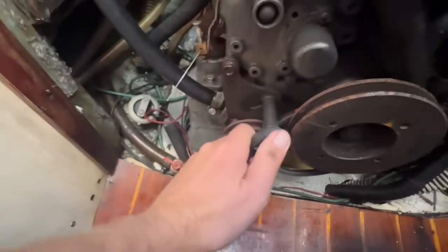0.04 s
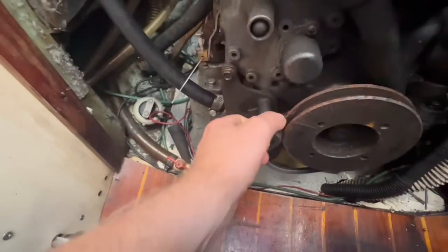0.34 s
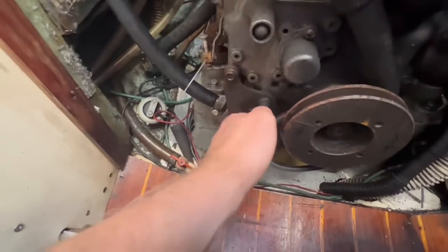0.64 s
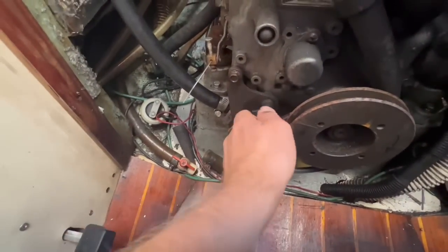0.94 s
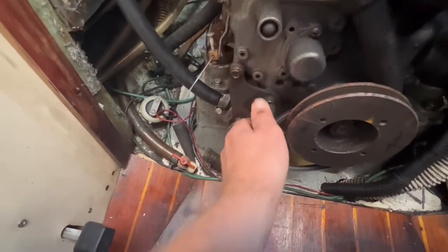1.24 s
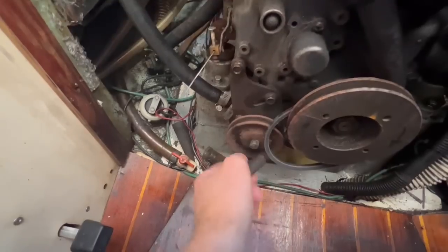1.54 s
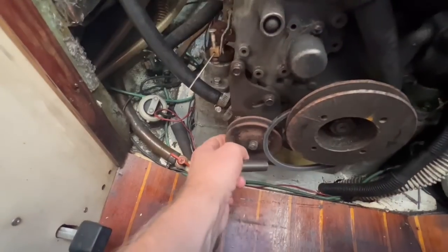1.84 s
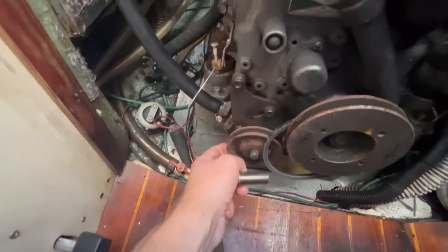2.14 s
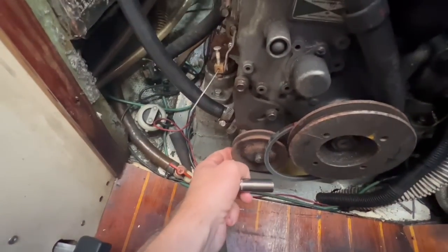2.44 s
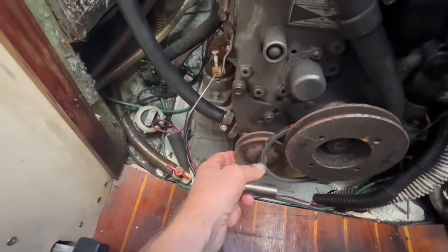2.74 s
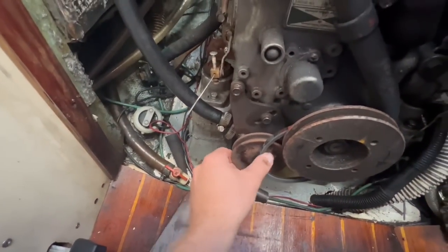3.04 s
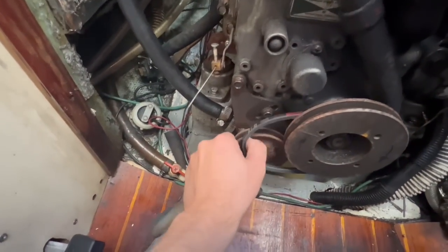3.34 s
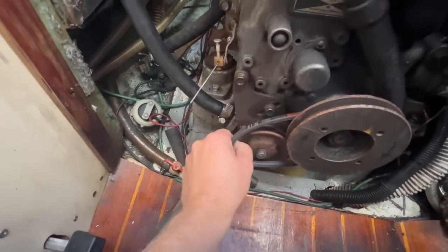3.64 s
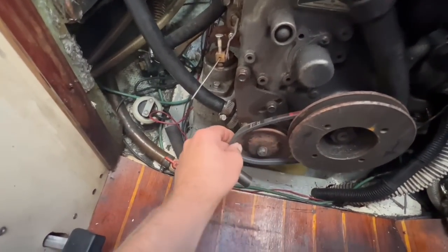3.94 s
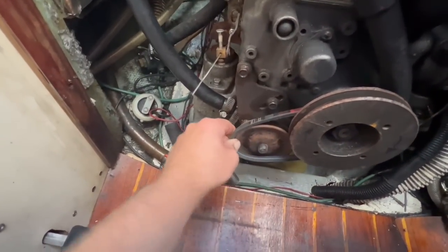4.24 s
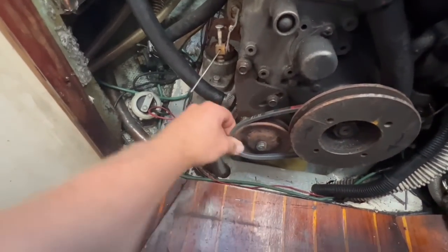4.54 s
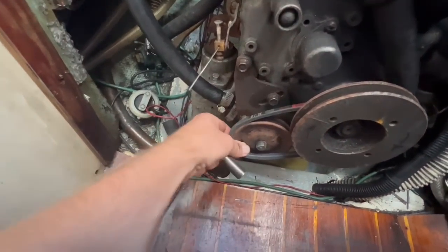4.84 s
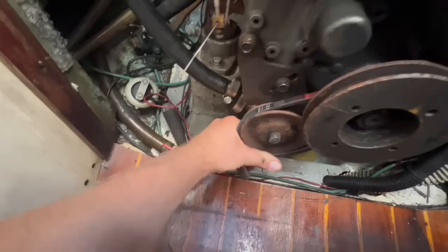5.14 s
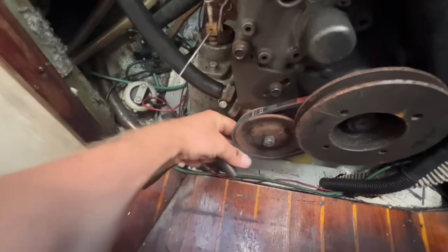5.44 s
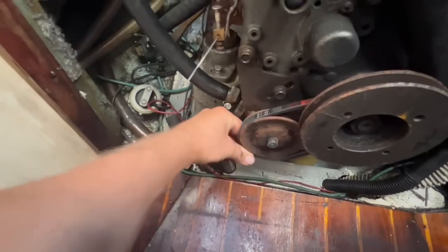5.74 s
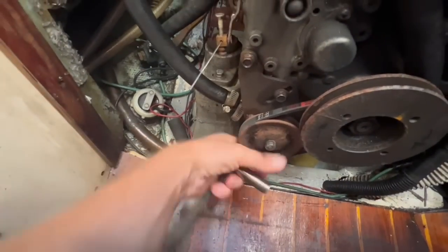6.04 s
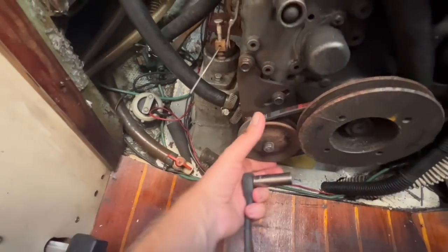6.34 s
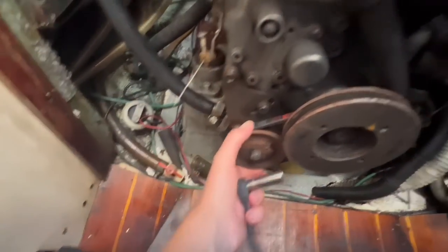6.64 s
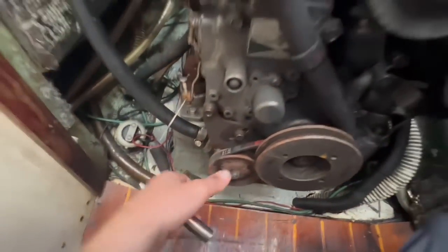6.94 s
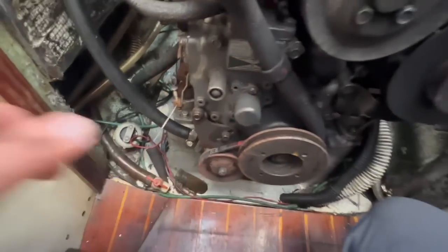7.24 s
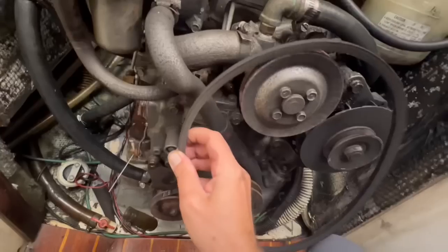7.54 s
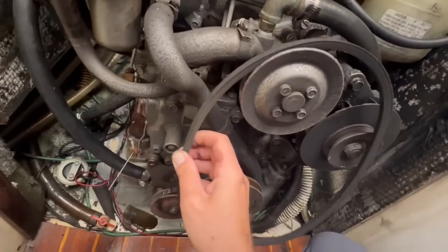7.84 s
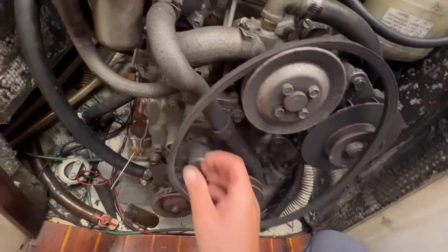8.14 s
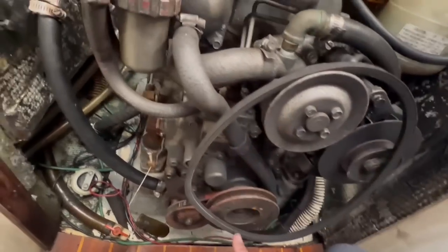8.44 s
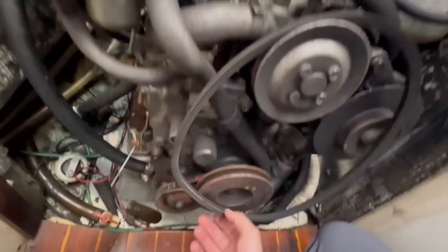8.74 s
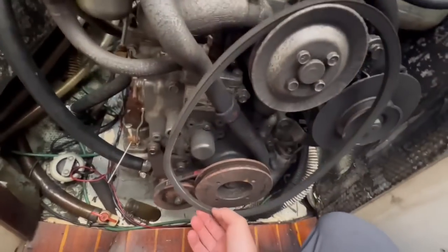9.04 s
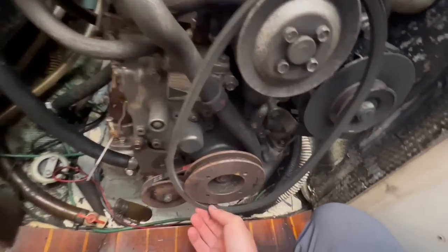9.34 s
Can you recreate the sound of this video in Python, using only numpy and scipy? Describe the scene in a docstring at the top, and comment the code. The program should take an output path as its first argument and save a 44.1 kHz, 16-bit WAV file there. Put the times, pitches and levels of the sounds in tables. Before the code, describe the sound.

A rubber belt is worked onto metal engine pulleys, with light rubbing, a brief creak, and scattered clicks and knocks.

```python
"""In the cramped bay of a stopped engine, a hand holding a socket wrench works a rubber V-belt onto steel pulleys.
The taut belt creaks in its groove by stick-slip friction, slides in fits and slaps against the block.
Impacts excite the damped modes of the wrench, the pulleys, a thin flange and the floorboards.
The bay adds a short reverberation, over a low rumble, a distant machine's hum and a faint hiss.
Sources are computed as mid and side signals, then decoded to left and right."""
import sys
import numpy as np
from scipy import signal
from scipy.fft import rfft, irfft, next_fast_len
from scipy.io import wavfile
from scipy.ndimage import uniform_filter1d, map_coordinates

SR = 44100
rng = np.random.default_rng(int(sys.argv[2]) if len(sys.argv) > 2 else 0)


def wrap_up_sound(samples):
    """Save the sound to the file named by the first command line argument, as 16-bit audio."""
    columns = np.atleast_2d(samples).T
    # keep every value between -1 and 1, then stretch to whole-number steps
    tamed = np.clip(columns, -1, 1)
    steps = np.round(tamed * 32767).astype(np.int16)
    wavfile.write(sys.argv[1], SR, steps)


N = 418509
T = np.arange(N) / SR


def amp(db):
    """Decibels to amplitude ratio; table levels are relative, and gains in series add in dB."""
    return 10 ** (np.asarray(db) / 20)


def unit(x):
    """Normalisation to an rms of 1."""
    return x / np.sqrt(np.mean(x ** 2) + 1e-20)


def along(points, hz):
    """Interpolation of (frequency_hz, value) points on a logarithmic frequency axis."""
    freqs, values = np.transpose(points)
    return np.interp(np.log(hz + 1), np.log(freqs + 1), values)


def noise(size=N):
    """Uncorrelated white noise for mid and side."""
    return rng.standard_normal((2, size))


def wobble(knots_per_s):
    """Slow random modulation: a spline through Gaussian knots."""
    return map_coordinates(rng.standard_normal(int(N * knots_per_s / SR) + 4), [T * knots_per_s])


def fade(t, t60):
    """Exponential decay, 60 dB in t60 seconds."""
    return np.exp(-np.log(1000) * t / t60)


def swell(peak_s, rise_s, fall_s, drop_db=15, roundness=1.58):
    """A rounded envelope, drop_db down at one rise time before its peak and one fall time after."""
    away = np.where(T < peak_s, (peak_s - T) / rise_s, (T - peak_s) / fall_s)
    return np.where(away < 5, amp(-drop_db * away ** roundness), 0)


def add(track, start_s, sound):
    """Superposition of a sound on the track."""
    part = track[:, max(round(start_s * SR), 0):][:, :sound.shape[1]]
    part += sound[:, :part.shape[1]]


def filtered(x, gain):
    """Linear filtering: the spectrum of x times gain(hz)."""
    size = next_fast_len(N + SR // 2)
    return irfft(rfft(x, size) * gain(np.fft.rfftfreq(size, 1 / SR)), size)[..., :N]


def colour(x, gain_db):
    """Minimum-phase filtering by the shape gain_db(hz); white noise keeps its power."""
    n = x.shape[-1]
    size = 2 * next_fast_len(n // 2 + 4096)
    gain = unit(amp(gain_db(np.fft.rfftfreq(size, 1 / SR))))
    cepstrum = irfft(np.log(np.maximum(gain, 1e-6)))
    cepstrum[1:size // 2] *= 2  # folding the cepstrum makes the filter causal
    cepstrum[size // 2 + 1:] = 0
    return irfft(rfft(x, size) * np.exp(rfft(cepstrum)), size)[..., :n]


def shaped(x, spectrum):
    """Spectral shaping by (frequency_hz, level_db) points."""
    return colour(x, lambda hz: along(spectrum, hz))


def resonant(x, modes):
    """Forced response of (centre_hz, width_hz, level_db) resonances, summed in power."""
    def response_db(hz):
        powers = (amp(db) ** 2 / (1 + ((hz - centre) / width) ** 2) ** 2 for centre, width, db in modes)
        return 10 * np.log10(sum(powers))
    return colour(x, response_db)


def spread(x, depth):
    """Diffuse incidence: sound from all round the bay differs more between left and right in the mids."""
    # extra side signal: frequency_hz, gain_db
    widening = [(280, 2.5), (650, 7.5), (1000, 6), (1600, 1)]
    return np.array([x[0], filtered(x[1], lambda hz: amp(depth * along(widening, hz)))])


def rumble(gain_db=-2.0, heave_db=1.9):
    """Low-frequency noise heaves under slow amplitude modulation."""
    # rumble spectrum: frequency_hz, density_db
    spectrum = [(12, -49.5), (20, -10.5), (38, 1), (65, 5.5), (125, -4.5), (155, -16.5), (252, -20.5),
                (288, -23), (443, -31.5), (500, -54), (650, -62), (1100, -120)]
    # its slow contour: time_s, level_db
    contour = [(0.0, -61), (0.21, -55.5), (2.56, -52.5), (5.9, -54), (6.3, -55.5), (7.45, -57.5),
               (9.49, -59.5)]
    level_db = np.interp(T, *np.transpose(contour))
    return amp(level_db + gain_db + heave_db * wobble(7)) * shaped(noise(), spectrum)


def hiss(level_db=-75, waver_db=1.5):
    """Broadband noise wavers faintly while a thin, narrower band comes and goes."""
    # broad hiss: frequency_hz, density_db
    spectrum = [(200, 10), (450, -7), (800, -14), (1250, -12.5), (1900, -4.5), (4500, -13.5), (6000, -21),
                (9500, -19), (15000, -16.5)]
    # colour of the thin hiss: centre_hz, width_hz, level_db
    thin_bands = [(5950, 320, 0.5), (8000, 1900, -8)]
    # its swells: peak_s, level_db
    thin_swells = [(2.801, -73), (4.8, -72), (6.6, -63), (7.8, -75), (8.55, -78)]
    broad = amp(level_db + waver_db * wobble(11)) * spread(shaped(noise(), spectrum), depth=1.9)
    envelope = sum(amp(db) * swell(s, rise_s=0.44, fall_s=0.44) for s, db in thin_swells)
    return broad + envelope * resonant(noise(), thin_bands)


def wavering_tone(pitch_hz, knots_per_s, waver_rad=0.58):
    """A sinusoid of rms 1 under random phase modulation, in the mid signal alone."""
    phase = 2 * np.pi * pitch_hz * T + waver_rad * wobble(knots_per_s)
    return np.array([np.sqrt(2) * np.sin(phase), np.zeros(N)])


def hum():
    """A distant machine radiates a line spectrum of low, wavering tones."""
    # hum partials: pitch_hz, level_db
    partials = [(49, -67.5), (76, -66.5), (120, -72)]
    return sum(amp(db) * wavering_tone(hz, knots_per_s=4.4) for hz, db in partials)


def drone(pitch_hz=235, level_db=-68.5):
    """A faint low tone swells and fades under a single envelope."""
    envelope = swell(peak_s=1.78, rise_s=0.263, fall_s=0.263)
    return amp(level_db) * envelope * wavering_tone(pitch_hz, knots_per_s=1.94)


def bay(x):
    """Reverberation: convolution with a short noise tail whose treble decays soonest."""
    # reverberation time of the engine bay: frequency_hz, t60_s
    decay = [(200, 0.13), (2000, 0.15), (10000, 0.054)]
    hz, t, spectra = signal.stft(noise(SR // 3), SR, nperseg=256)
    tail = signal.istft(spectra * fade(t, along(decay, hz)[:, None]), SR, nperseg=256)[1]
    return signal.fftconvolve(x, tail / np.linalg.norm(tail[0]), axes=1)[:, :N]


def ringing(taps, modes, gain_db, attack_s, roughness, side_db):
    """Free vibration: each tap excites damped modes, and the rubbing contact makes their phases wander."""
    out, t = np.zeros((2, N)), np.arange(SR // 3) / SR
    hz, db, t60 = np.transpose(modes)[:, :, None]
    onset = 1 - np.exp(-t / attack_s)
    for s, tap_db in taps:
        wander = np.cumsum(rng.standard_normal((len(hz), len(t))), axis=1) / np.sqrt(SR)
        phase = 2 * np.pi * hz * t + roughness * wander
        envelopes = amp(db + rng.standard_normal(hz.shape)) * fade(t, t60)
        mid = np.sum(envelopes * np.sin(phase), axis=0)
        side = -amp(side_db) * np.sum(envelopes * np.cos(phase), axis=0)  # the left channel lags
        add(out, s, amp(tap_db + gain_db) * onset * np.array([mid, side]))
    return out


def chatter(rattles, contacts=6):
    """Intermittent contact: each rattle shares its energy among uneven taps, (start_s, level_db)."""
    order = np.arange(contacts)
    for s, length, db in rattles:
        moments = (order + rng.random(contacts) * (order > 0)) / contacts
        levels_db = db - 10 * np.log10(contacts) + 2 * rng.standard_normal(contacts)
        yield from zip(s + length * moments, levels_db)


def floorboards():
    """Soft bumps excite the low bending modes of the boards."""
    # bumps on the floor: start_s, level_db
    bumps = [(0.19, -52.5), (2.06, -61), (2.22, -56.5), (3.87, -55.5), (5.24, -66)]
    # board modes: pitch_hz, level_db, t60_s
    modes = [(161, 7.5, 0.114), (243.5, -3, 0.24), (332, -4, 0.13), (560, -29, 0.088)]
    return ringing(bumps, modes, gain_db=-1.0, attack_s=0.0034, roughness=4.2, side_db=-23)


def wrench():
    """The wrench chatters against the engine; repeated impacts excite its high modes."""
    # wrench rattles: start_s, length_s, level_db
    rattles = [(3.15, 0.063, -55), (3.5444, 0.046, -45), (3.628, 0.015, -55), (3.692, 0.037, -56.5),
               (4.08, .025, -58.5), (4.2767, 0.0028, -57), (4.32, 0.11, -53.5), (4.49, 0.061, -53),
               (4.619, 0.0042, -57.5), (5.5084, 0.0034, -55.5)]
    # wrench modes: pitch_hz, level_db, t60_s
    modes = [(3624, 1.5, 0.095), (7720, 2, 0.073), (11400, -4.5, 0.044)]
    return ringing(chatter(rattles), modes, gain_db=-3.0, attack_s=0.00041, roughness=15, side_db=-10.5)


def flange():
    """The belt makes a thin steel flange chatter and sing in its plate modes."""
    # flange rattles: start_s, length_s, level_db
    rattles = [(7.657, 0.0033, -58), (8.018, .04, -53), (8.125, .055, -53.5), (8.825, 0.016, -50.5),
               (9.12, 0.083, -54.5), (9.221, 0.00187, -60), (9.388, .02, -59), (9.478, 0.0092, -57.5)]
    # flange modes: pitch_hz, level_db, t60_s
    modes = [(4270, -11.5, 0.22), (5460, 0, 0.096), (5500, -11, 0.074), (8050, 4, 0.14), (12200, -2, 0.14)]
    return ringing(chatter(rattles), modes, gain_db=-10.0, attack_s=0.0004, roughness=13, side_db=-7.0)


def upper_pulley():
    """The belt drops on the upper pulley, which rings in inharmonic modes."""
    # belt impacts: start_s, level_db
    taps = [(7.570, -31), (7.658, -63)]
    # pulley modes: pitch_hz, level_db, t60_s
    modes = [(750, -20, 0.12), (890, 3.5, 0.072), (1908, 0.5, 0.13), (2840, 4, 0.015), (3850, -17, 0.07),
             (4000, -4.5, 0.16), (5670, -8, 0.11), (6000, -2, 0.068), (6300, -9.5, 0.12),
             (7160, -9.5, 0.075), (9000, -19, 0.077)]
    return ringing(taps, modes, gain_db=-7.5, attack_s=0.00053, roughness=3.3, side_db=-32)


def pulley_rim():
    """One blow sets a pulley rim in free vibration."""
    # the blow: start_s, level_db
    taps = [(9.421, -36.5)]
    # rim modes: pitch_hz, level_db, t60_s
    modes = [(590, -22, 0.087), (980, -9, 0.054), (1295, -9, 0.095), (4120, 3.5, 0.065), (4430, 1, 0.22),
             (6430, -9, 0.1)]
    return ringing(taps, modes, gain_db=-9.0, attack_s=0.00028, roughness=8.2, side_db=-5.0)


def friction(grains_per_s, grain_share, flutter_db):
    """Friction noise: tiny random catches over a smooth hiss, modulated by an uneven hand."""
    catches = unit((rng.random(N) < grains_per_s / SR) * noise())
    texture = np.sqrt(grain_share) * catches + np.sqrt(1 - grain_share) * noise()
    return unit(texture * amp(flutter_db * wobble(70)))


def drifting(x, drift_db=2.0):
    """As the contact moves, its spectrum shifts in patches of time and frequency."""
    spectra = signal.stft(x, nperseg=1024)[2]
    patches = uniform_filter1d(rng.standard_normal(spectra.shape[1:]), size=3, axis=0)
    patches = uniform_filter1d(patches, size=14, axis=1)
    return unit(signal.istft(spectra * amp(drift_db * unit(patches)), nperseg=1024)[1][:, :N])


def grinding():
    """Forced vibration: rubber dragged round the small pulley drives the resonances of its groove."""
    # pulls on the belt: peak_s, level_db, rise_s, fall_s
    pulls = [(1.359, -65, 0.077, 0.055), (4.379, -69, 0.18, 0.1), (5.319, -65.5, 0.32, 0.54),
             (6.04, -65.5, 0.07, 0.13)]
    # groove resonances: centre_hz, width_hz, level_db
    groove = [(2700, 420, -0.5), (3590, 190, -2), (4300, 240, -3), (4970, 350, -8), (5700, 320, -6)]
    pull = sum(amp(db) * swell(s, rise, fall) for s, db, rise, fall in pulls)
    return pull * resonant(friction(grains_per_s=560, grain_share=0.1, flutter_db=2.0), groove)


def riding_pull(start_s=8.29, end_s=9.1, attack_t60=0.044, release_t60=0.51, ease_db_per_s=2.5):
    """Envelope of the belt riding on the upper pulley: a steady pull that eases exponentially."""
    held = np.clip(T, start_s, end_s)
    edges = fade(np.abs(T - held), np.where(T < held, attack_t60, release_t60))
    return amp(-ease_db_per_s * (held - start_s)) * edges


def sliding(drag_db=-3, ride_db=-65.0, ring_db=-12, drag_catch_db=3.0, rub_catch_db=1.0):
    """Sliding friction: belt and hand rub the metal, pressure adds drag, the belt rides the upper pulley."""
    # strokes along the metal: peak_s, rub_level_db, rise_s, fall_s, drag_level_db
    strokes = [(0.139, -53, 0.17, 0.2, -62.5), (0.45, -63, 0.11, 0.23, -63.5),
               (0.69, -66, 0.12, 0.089, -87), (0.98, -65.5, 0.29, 0.26, -68.5),
               (1.35, -62.5, 0.31, 0.11, -73.5), (1.702, -68.5, 0.84, 0.16, -80),
               (2.22, -66, 0.34, 0.39, -63.5), (2.69, -64, 0.33, 0.19, -63), (2.89, -62.5, 0.19, 0.14, -80),
               (3.19, -62, 0.14, 0.12, -65.5), (3.65, -68.5, 0.22, 0.18, -69.5),
               (3.87, -69, 0.074, 0.14, -73), (4.12, -64.5, 0.16, 0.33, -70),
               (4.36, -58.5, 0.16, 0.22, -68), (4.58, -64.5, 0.034, 0.24, -68.5),
               (4.88, -67.5, 0.15, 0.073, -73.5), (5.22, -63.5, 0.069, 0.24, -67.5),
               (5.5, -69.5, 0.77, 0.22, -68.5), (6.04, -59.5, 0.31, 0.14, -67),
               (6.27, -61.5, 0.13, 0.11, -83), (6.78, -52.5, 0.5, 0.56, -59),
               (7.18, -58.5, 0.066, 0.26, -69.5), (8.1, -77, 0.12, 0.12, -69.5),
               (8.33, -92, 0.067, 0.39, -72), (8.55, -67, 0.19, 0.43, -68)]
    # light rubbing: frequency_hz, density_db
    rub_spectrum = [(600, -27.5), (1050, -9), (1400, -6), (1850, -2.5), (2250, 3), (2600, 2.5), (3400, 0.5),
                    (4400, -2), (6000, 1.5), (8000, -1.5), (11200, -7), (15000, -12)]
    # a resonance that the rubbing excites: centre_hz, width_hz, level_db
    rub_resonance = [(2574, 230, 0)]
    # heavy dragging: frequency_hz, density_db
    drag_spectrum = [(88, -27.5), (150, -2), (300, -1), (450, -6.5), (650, -10.5), (850, -8), (1300, -9),
                     (1900, -9), (3300, -58.5)]
    # the upper pulley under the sliding belt: centre_hz, width_hz, level_db
    pulley_body = [(547, 45, 4.5), (780, 430, 0.5), (2020, 1200, -9.5), (6840, 4500, -12)]
    power = np.zeros((2, N))
    for s, light_db, rise, fall, heavy_db in strokes:
        power += (amp([[light_db], [heavy_db]]) * swell(s, rise, fall)) ** 2
    light, heavy = np.sqrt(power)
    rub = shaped(drifting(friction(grains_per_s=750, grain_share=0.16, flutter_db=1.05)), rub_spectrum)
    drag = shaped(drifting(friction(grains_per_s=470, grain_share=0.27, flutter_db=1.5)), drag_spectrum)
    ride = resonant(drifting(friction(grains_per_s=560, grain_share=0.26, flutter_db=0.5)), pulley_body)
    catch = wobble(22)  # the rubber grips and lets go, so the drag comes in fits
    drag = heavy * unit(drag * amp(drag_catch_db * catch))
    rub += amp(ring_db) * resonant(noise(), rub_resonance)
    rub = light * unit(rub * amp(rub_catch_db * catch))
    return spread(rub + amp(drag_db) * drag + amp(ride_db) * riding_pull() * ride, depth=1.05)


def contact_db(hz, centre_hz, octaves):
    """An impact's spectrum: a hump around its centre, falling away in the deep bass and far treble."""
    away = np.log2((hz + 1) / centre_hz) / octaves
    hump = -14 * np.log10(1 + away ** 2 + 0.021 * away ** 4)
    return hump + along([(100, 5), (500, 3.5), (11000, -1.5), (15000, 3.5)], hz)


def blow(track, s, db, centre_hz, octaves, t60, scuff_s, thud_db, tone=0, crack=0):
    """A damped impact: a scuff rises into a blow, with optional crack or hollow tone; the block thuds."""
    # response of the engine block: frequency_hz, density_db
    block = [(60, 7), (150, 9.5), (420, 3), (700, -15.5), (1500, -51)]
    t = np.arange(-(SR // 20), SR // 4) / SR  # contact at t = 0
    envelope = fade(np.maximum(t, 0), t60) * fade(np.maximum(-t, 0), 2 * scuff_s)
    envelope *= 1 + crack * fade(np.abs(t), t60=0.015)
    contact = colour(envelope * noise(len(t)), lambda hz: contact_db(hz, centre_hz, octaves))
    contact[0] += tone * (t > 0) * fade(np.abs(t), t60) * np.sin(2 * np.pi * centre_hz * t)
    thud = shaped((t > 0) * fade(np.abs(t), t60=0.16) * noise(len(t)), block)
    add(track, s + t[0], amp(db) * (contact + amp(thud_db) * thud))


def impacts(gain_db=-8):
    """Bandwidth and damping set the timbre: hollow knocks, heavy thumps, bright snaps, thin clicks."""
    # fingers and belt knock on the engine: time_s, level_db, centre_hz
    knocks = [(1.255, -48.5, 1380), (1.552, -48.5, 2810), (2.056, -48.5, 1500), (3.201, -40.5, 1840),
              (3.313, -55.5, 2110), (4.934, -56.5, 2440), (5.007, -56.5, 2090), (5.48, -61, 600),
              (5.51, -48.5, 3190), (6.976, -44, 885), (7.041, -44, 1500), (7.129, -44.5, 760),
              (7.570, -31, 828), (7.655, -48, 815), (9.411, -42.5, 860)]
    # the slack belt thumps on the block: time_s, level_db, centre_hz
    thumps = [(2.361, -56, 400), (2.588, -51, 540), (2.66, -51, 382), (2.714, -48.5, 470),
              (2.792, -48, 312), (3.546, -50.5, 220), (3.684, -51, 220), (5.531, -52.5, 300),
              (5.841, -41.5, 400), (7.57, -48.5, 464), (7.656, -56.5, 496), (7.781, -63.5, 600),
              (7.86, -60, 650), (8.286, -58, 740), (9.42, -47.5, 600)]
    # the belt scuffs over a rim and snaps home: time_s, level_db, centre_hz, scuff_s
    snaps = [(3.5247, -29.5, 7100, 0.023), (5.836, -33, 2540, 0.018), (9.42, -39.5, 3820, 0.0053)]
    # small clicks of metal: time_s, level_db, centre_hz, t60_s
    clicks = [(2.362, -45.5, 2260, 0.11), (2.59, -47, 3500, 0.037), (2.791, -49, 5030, 0.037),
              (3.331, -57.5, 8900, 0.11), (3.544, -44, 2480, 0.18), (3.684, -43.5, 5030, 0.042),
              (3.743, -45.5, 7000, 0.033), (3.853, -53, 7500, 0.025), (4.277, -38, 7960, 0.009),
              (5.01, -44, 8300, 0.061), (7.572, -33, 2480, 0.028), (8.094, -62, 3020, 0.058),
              (8.109, -54.5, 3000, 0.048), (8.126, -63, 2600, 0.032), (9.096, -35, 10800, 0.03)]
    out = np.zeros((2, N))
    for s, db, hz in knocks:
        t60 = 0.052 * (1000 / hz) ** 0.11  # higher knocks die sooner
        blow(out, s, db, hz, octaves=0.24, t60=t60, scuff_s=0.00068, thud_db=-22.0, tone=1.3)
    for s, db, hz in thumps:
        blow(out, s, db, hz, octaves=0.52, t60=0.032, scuff_s=0.02, thud_db=3.5)
    for s, db, hz, scuff_s in snaps:
        blow(out, s, db, hz, octaves=0.83, t60=0.08, scuff_s=scuff_s, thud_db=-24, crack=1.05)
    for s, db, hz, t60 in clicks:
        blow(out, s, db, hz, octaves=0.97, t60=t60, scuff_s=0.0016, thud_db=-19.5)
    return amp(gain_db) * out


def slips(start_s, length_s, slips_per_s, gap_ratio, jitter=0.03, scatter_db=1.35):
    """Relaxation oscillation: the belt sticks and lets go unevenly; (start_s, level_db) for each slip."""
    gaps = gap_ratio ** np.linspace(0, 1, round(length_s * slips_per_s))
    steps = np.cumsum(np.r_[0, gaps])
    times = start_s + length_s * steps / max(steps[-1], 1e-9)
    timing, strength = rng.standard_normal((len(times), 2)).T
    times[1:-1] += jitter / slips_per_s * timing[1:-1]
    return zip(times, scatter_db * strength)


def creak(gain_db=-4.0, tear_s=0.002, echo_share=0.45, tint_db=2.5, ring_width_hz=170, scrape_db=-33.5):
    """Stick-slip friction: each slip tears loose, rings the taut belt and echoes between nearby walls."""
    # runs of slips in the groove:
    # start_s, length_s, slips_per_s, last_to_first_gap_ratio, level_db, tilt_db_per_octave, ring_hz
    runs = [(0.4609, 0.012, 85, 1, -24.5, 0.5, 2640), (0.492, 0.036, 80, 1, -24, -0.2, 2480),
            (0.632, 0.00046, 85, 1, -24.5, -1, 2750), (0.8455, 0.054, 127, 1.5, -23, 0.05, 3130),
            (0.91, 0.0075, 138, 1, -22, 1, 3230), (0.9333, 0.01, 87, 1, -24, 2.5, 3100),
            (0.955, 0.019, 166, 1, -23.5, 1.5, 3140), (0.982, 0.017, 60, 1, -24, 0, 3360)]
    # creak spectrum: frequency_hz, density_db
    spectrum = [(240, -37.5), (630, -30), (850, -22), (1150, -12.5), (1630, -20.5), (2100, -12), (2520, -2),
                (2950, -11.5), (3500, -5), (4800, -7.5), (7320, -0.5), (9400, -2.5), (11100, -2.5),
                (12500, -6), (15600, -10)]
    tears, rings = np.zeros((2, N)), np.zeros((2, N))
    t = np.arange(SR // 6) / SR
    echoes = noise(len(t))  # the same walls answer every slip
    onset = 1 - np.exp(-t / 0.0006)
    direct = fade(np.maximum(t - tear_s, 0), t60=0.026)
    tail = amp(-14) * fade(t, t60=0.12)
    envelope = onset * np.hypot(direct, tail)
    bands_hz = np.geomspace(700, 14000, 16)
    for start_s, length_s, slips_per_s, gap_ratio, run_db, tilt, ring_hz in runs:
        slope_db = tilt * np.log2(bands_hz / 7000)
        for s, db in slips(start_s, length_s, slips_per_s, gap_ratio):
            rattle = np.sqrt(echo_share) * echoes + np.sqrt(1 - echo_share) * noise(len(t))
            rattle = unit(rattle * np.sqrt(np.abs(rattle)))  # a few strong echoes stand out
            burst = amp(run_db + db + gain_db) * envelope * rattle
            # each patch of rubber has its own colour
            patch_db = slope_db + tint_db * rng.standard_normal(len(bands_hz))
            add(tears, s, shaped(burst, np.column_stack([bands_hz, patch_db])))
            add(rings, s, resonant(burst, [(ring_hz, ring_width_hz, 0)]))
    # from the start of the longest run the belt never quite sticks, and scrapes briefly
    longest_start_s = max(runs, key=lambda run: run[1])[0]
    pull = amp(scrape_db) * (T > longest_start_s) * swell(peak_s=0.96, rise_s=0.1, fall_s=0.05)
    scrape = pull * friction(grains_per_s=1400, grain_share=0.24, flutter_db=-4.0)
    ring_gains = amp([[-21], [-11]])  # mid, side
    return shaped(tears + scrape, spectrum) + ring_gains * rings


def stereo(mid, side, lag_share=0.41, facing_s=7.49):
    """Mid-side decoding for two microphone ports; from facing_s the work is straight ahead."""
    # width for work off to one side: frequency_hz, side_gain_db
    width_aside = [(40, -35), (110, -13.5), (250, -2.5), (750, 4), (1200, 4.5), (1750, -2.5), (2500, 0.5),
                   (3200, 4), (4100, -3), (4800, 0), (6000, -8), (8000, -2), (9500, -4.5), (11300, 2)]
    # width for work ahead, on the upper pulley: frequency_hz, side_gain_db
    width_ahead = [(40, -44), (110, -11.5), (700, -2), (1200, -4.5), (1900, -12), (3200, -1), (6000, -7),
                   (11300, 0)]
    # above about 12 kHz the centre fades, leaving the highest treble wide: frequency_hz, mid_gain_db
    mid_top_rolloff = [(11300, 0), (11900, -9), (12600, -28.5), (14000, -23.5)]
    quadrature = filtered(mid, lambda hz: -1j)  # makes the left port lag in phase
    side = np.sqrt(1 - lag_share ** 2) * side + lag_share * quadrature
    aside = filtered(side, lambda hz: amp(along(width_aside, hz)))
    ahead = filtered(side, lambda hz: amp(along(width_ahead, hz)))
    side = np.where(T < facing_s, aside, ahead)
    mid = filtered(mid, lambda hz: amp(along(mid_top_rolloff, hz)))
    return np.array([mid + side, mid - side])


def scene(creak_room_db=-19, impact_room_db=-10):
    """Superposition of all sources; the creaks and impacts also excite the bay's reverberation."""
    creaks, blows = creak(), impacts()
    room = bay(amp(creak_room_db) * creaks + amp(impact_room_db) * blows)
    struck = wrench() + upper_pulley() + pulley_rim() + flange() + floorboards()
    rubbed = sliding() + grinding()
    background = rumble() + hiss() + hum() + drone()
    mid, side = background + room + struck + rubbed + blows + creaks
    return stereo(mid, side)


def record(dry, top_hz=15900):
    """Gain modulation and band limiting: the level dips twice, briefly, and nothing passes above top_hz."""
    # dips in level: time_s, gain_db, fall_s, return_s
    dips = [(5.078, -22, 0.013, 0.015), (7.487, -23, 0.021, 0.037)]
    gain = amp(sum(db * swell(s, fall, back) for s, db, fall, back in dips))
    return filtered(dry * gain, lambda hz: hz < top_hz)


dry = scene()
out = record(dry)
wrap_up_sound(out)
```